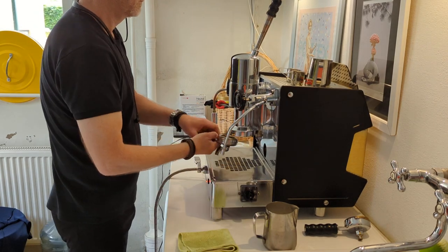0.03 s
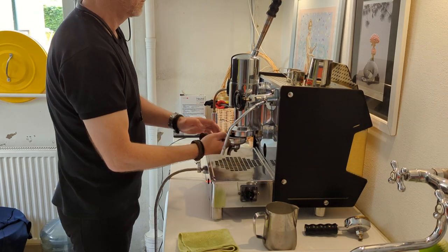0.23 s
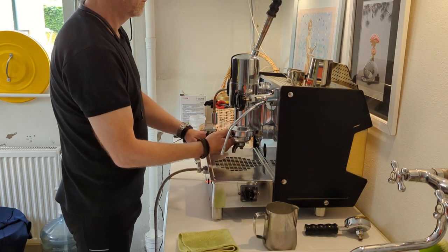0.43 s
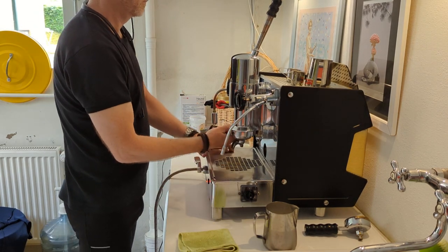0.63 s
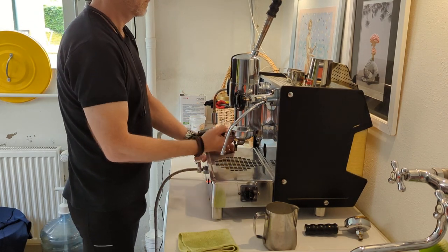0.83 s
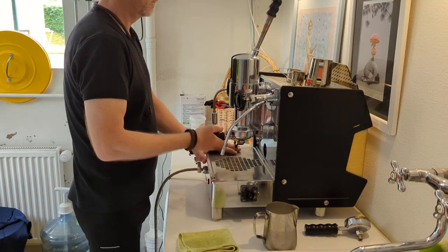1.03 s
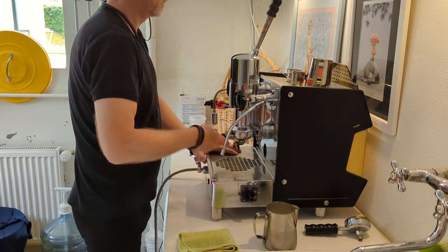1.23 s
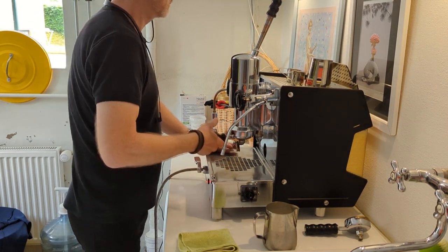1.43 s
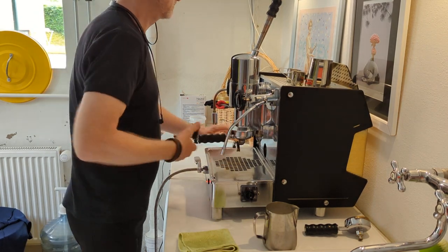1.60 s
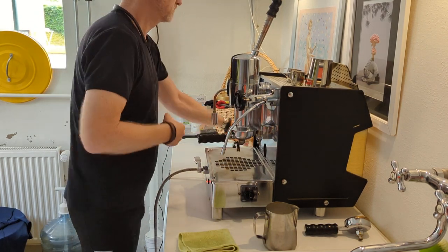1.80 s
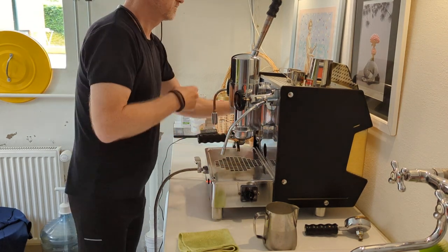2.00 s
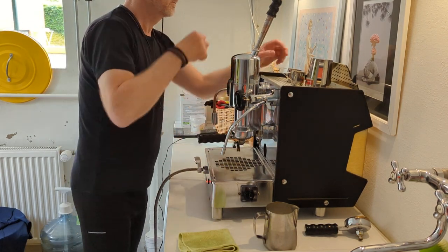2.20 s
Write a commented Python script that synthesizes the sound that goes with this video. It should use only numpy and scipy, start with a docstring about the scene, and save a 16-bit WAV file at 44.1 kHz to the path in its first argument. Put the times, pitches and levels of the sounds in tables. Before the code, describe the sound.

A steel portafilter clunks against an espresso machine at about 0.25 seconds, then rattles in a quick cluster of knocks from 0.5 to 0.65 seconds as the casing booms low. It scrapes at 0.8 seconds, with fainter scrapes and ticks until 1.5. A palm slaps the handle at 1.7 seconds, and clothes rustle softly until about 2.3. The sound is fairly close, in a small, quiet room.

```python
"""In a small, hard-walled quiet room, a steel portafilter is pushed up into the group of a lever espresso
machine, about a metre and a half away. It knocks and chatters against the collar, exciting steel modes
and panels, while the casing booms under the hands. Stick-slip friction scrapes as it is turned tight.
At 1.7 s a palm slaps the handle home; then clothes rustle and sleeves hiss as the arms rise."""
import sys
import numpy as np
from scipy import signal
from scipy.fft import rfft, irfft
from scipy.io import wavfile
from scipy.ndimage import uniform_filter1d

SR = 44100
rng = np.random.default_rng(int(sys.argv[2]) if len(sys.argv) > 2 else 0)


def master_out(mix):
    """Clip the mix to full scale and print it as 16-bit PCM to the path in sys.argv[1]."""
    frames = np.transpose(np.atleast_2d(mix))
    ceiling = np.clip(frames, -1, 1)
    pcm = np.round(ceiling * 32767).astype(np.int16)
    wavfile.write(sys.argv[1], SR, pcm)


N = 103635

# steel on steel (time [s], level [dB], bass [dB], hollowness [dB], brightness [dB], air [dB],
# chatter decay [s], ring against panels [dB], two favoured resonances [Hz])
KNOCK_EVENTS = [(0.2357, -33.5, -1, 1.5, 1.5, 10, 0.013, -2, 3320, 10000),
                (0.2690, -28, -9.5, -7, 1, -3, 0.0017, -3.5, 1740, 1994),
                (0.3135, -39.5, 1, 2, -8, 4.5, 0.0073, -6, 1994, 3320),
                (0.408, -41.5, -8, -0.5, -9, -5.5, 0.0048, -4, 1331, 1655),
                (0.495, -31.5, -1, 4, 6.5, 1, 0.0017, 2, 1198, 2812),
                (0.5301, -25.5, -3.5, -0.5, -5, 0.5, 0.0015, -1, 1198, 6380),
                (0.5426, -29, -3, -2, -2, -8.5, .002, -0.5, 1331, 1994),
                (0.5780, -36, 4.5, 5, 12.5, 13, 0.0032, -7.5, 2502, 4650),
                (0.5860, -30.5, -1.5, -7.5, 7, 8, 0.002, -1.5, 2812, 3320),
                (0.6350, -22, -1.5, -5, -2, -3, 0.0011, -4, 1922, 4404),
                (0.6435, -24, -0.5, 0, -8, -9, 0.0064, -2, 1922, 2812),
                (1.2338, -56, 9.5, -0.5, 1, -12, 0.0089, -6, 300, 6380),
                (1.2700, -52.5, 7, 0, -7, -15, 0.0061, -6.5, 300, 699)]
def knocks():
    """Impact excitation: the portafilter delivers an impulse, then dying chatter on the collar."""
    t, out = np.arange(SR // 3) / SR, np.zeros(N)
    for start, db, *tone_db, chatter_s, ring_db, first_hz, second_hz in KNOCK_EVENTS:
        chatter = energy(contacts(t) * np.exp(-t / chatter_s))
        force = (t == 0) + undb(-4.5) * chatter
        out += undb(db) * place(metal(force, t, ring_db, tone_db, (first_hz, second_hz)), start)
    return out


# lugs on the collar (time [s], level [dB], bass [dB], brightness [dB], air [dB], rise [s], fall [s])
SCRAPE_EVENTS = [(0.434, -50, -7, -10, -1, 0.023, 0.014), (0.8150, -48.5, -8, 8.5, 4, 0.0013, 0.0093),
                 (0.8215, -35.5, 0.5, -4.5, -8.5, 0.018, .018), (1.0080, -61.5, 13, 2, 19.5, 0.0051, 0.052),
                 (1.024, -51, 3, -13.5, -1, 0.0087, 0.018), (1.1050, -59.5, 4, -4.5, 3, 0.0086, 0.02),
                 (1.444, -64.5, 14.5, -3.5, 2, 0.028, 0.064)]
def scrapes():
    """Stick-slip friction: the turning lugs drive the metal with a swell of tiny contacts."""
    t, out = np.arange(SR // 3) / SR, np.zeros(N)
    for start, db, bass, bright, air, rise, fall in SCRAPE_EVENTS:
        force = contacts(t) * swell(t, rise, fall)
        out += undb(db) * place(metal(force, t, ring_db=-6.5, tone_db=(bass, 0, bright, air)), start)
    return out


def contacts(t, per_s=730):
    """Poisson process: tiny contacts of random size."""
    return (rng.random(len(t)) < per_s / SR) * rng.standard_normal(len(t))


def metal(force, t, ring_db, tone_db, favoured_hz=()):
    """Superposition: panels and steel ring together; the point of contact sets the colour."""
    sound = energy(panels(force) + undb(ring_db) * steel_ring(force, t, favoured_hz))
    bass, hollow, bright, air = tone_db
    tone = [(250, bass), (800, hollow), (1250, hollow), (1900, 0), (4000, bright), (12000, air)]
    return colour(sound, tone) * np.sqrt(SR / 100)


# modes of portafilter and group (frequency [Hz], level [dB], T60 [s])
STEEL_RESONANCES = [(300, -2.5, 0.19), (455, -12.5, 0.46), (699, -4, 0.075), (835, -8, .15),
                    (1198, -8.5, .16), (1331, 1, 0.18), (1655, -14.5, 0.21), (1740, -8.5, 0.11),
                    (1922, -11.5, .16), (1994, -4, 0.053), (2502, -3, 0.081), (2812, -5.5, 0.06),
                    (3320, -11.5, 0.064), (3628, -17, 0.2), (4404, -17, 0.073), (4650, -11, 0.033),
                    (6380, -14.5, 0.11), (10000, -25.5, .06), (11470, -17, 0.044)]
def steel_ring(force, t, favoured_hz):
    """Modal ringing: clusters of three close modes beat; those the contact favours are lifted."""
    favour_db, reach, split = 9.5, 0.057, 0.0072  # reach and split are shares of the frequency
    ring = 0
    for hz, db, t60 in STEEL_RESONANCES:
        lift_db = favour_db * sum(np.exp(-(np.log(hz / f) / reach) ** 2) for f in favoured_hz)
        cluster_hz = (hz * (1 + split * (k + rng.random() - .5)) for k in (-1, 0, 1))
        cluster = sum(np.sin(2 * np.pi * (f * t + rng.random())) for f in cluster_hz)
        ring += undb(db + lift_db) * energy(cluster * stored_amplitude(force, t60))
    return energy(ring)


# ring of the panels (frequency [Hz], spectral level [dB])
PANEL_SPECTRUM = [(35, -27), (70, -6), (135, 6.5), (200, -8), (290, 4), (360, -3.5), (560, -5.5), (800, 0),
                  (1400, 1), (2600, -1.5), (3800, -5), (5400, -15), (6500, -14), (8200, -24), (11800, -22),
                  (16000, -34)]
def panels(force):
    """Modal overlap: dense, quickly damped modes merge into noise."""
    return energy(colour(burst(stored_amplitude(force, t60=0.033)), PANEL_SPECTRUM))


def stored_amplitude(force, t60):
    """Energy balance: each contact adds energy and damping drains it."""
    return np.sqrt(signal.lfilter([1], [1, -fade(2 / SR, t60)], force ** 2 + 1e-18))


# skin smack and fleshy thud on the handle (frequency [Hz], spectral level [dB])
SKIN_SPECTRUM = [(100, -9), (700, 2.5), (2800, -8.5), (4400, -18), (8000, -18), (13000, -12.5),
                 (15500, -21)]
THUD_SPECTRUM = [(35, -31), (80, 3.5), (120, -0.5), (170, -0.5), (260, 7.5), (400, 1.5), (550, -7),
                 (720, 3.5), (900, -4), (1700, -5), (2800, -4), (4200, -22.5), (6500, -18.5), (9000, -26),
                 (16000, -24)]
def slap():
    """Soft impact: the palm lands, the weight of the hand follows, and the fingers close."""
    t = np.arange(SR // 4) / SR
    thud = colour(burst(swell(t, rise=0.003, fall=0.014)), THUD_SPECTRUM)
    palm, fingers = (colour(burst(swell(t, rise=0.00043, fall=0.0045)), SKIN_SPECTRUM) for _ in range(2))
    return blow(palm, 1.7055, db=-38.5) + blow(thud, 1.7130, db=-30.5) + blow(fingers, 1.7205, db=-39)


# low modes of the casing (frequency [Hz], width of the narrower filter [Hz], level [dB])
CASING_MODES = [(66.7, 18, 2), (97, 14.6, -5), (139, 26, -5), (159.3, 61, -8), (285, 37, -12.5),
                (418, 74, -12), (690, 370, -13)]
# their boom (time [s], level [dB])
BOOM_LEVEL = [(0, -65.5), (.21, -86), (.26, -51), (.44, -49.5), (.53, -44), (.68, -42.5), (.76, -47.5),
              (.84, -49.5), (.97, -55.5), (1.17, -59.5), (1.28, -51.5), (1.44, -59), (1.53, -55),
              (1.66, -61), (1.8, -66), (1.95, -67), (2.08, -80), (2.35, -66)]
def casing():
    """Forced vibration: pushing and twisting shakes the low modes of the machine."""
    boom = 0
    for hz, width, db in CASING_MODES:
        q = hz / width
        drive = signal.lfilter(*signal.iirpeak(hz, q / 2, SR), rng.standard_normal(N))
        boom += undb(db) * unit(signal.lfilter(*signal.iirpeak(hz, q, SR), drive))
    return unit(boom) * curve(BOOM_LEVEL)


# rustle of cloth and fine hiss of sleeves (time [s], level [dB])
RUSTLE_LEVEL = [(0, -74), (.9, -69.5), (1.6, -75), (1.68, -58.5), (1.85, -66), (1.92, -73), (1.97, -64),
                (2.02, -69.5), (2.09, -70.5), (2.125, -63.5), (2.15, -68), (2.18, -63), (2.215, -67.5),
                (2.29, -60), (2.35, -62.5)]
HISS_LEVEL = [(0, -79), (2.1, -103.5), (2.2, -74), (2.3, -64), (2.35, -67)]
# their colours (frequency [Hz], spectral level [dB])
RUSTLE_SPECTRUM = [(100, -5), (350, -6.5), (800, -2.5), (1300, -2), (2000, 1), (3000, -3), (4500, -15.5),
                   (6500, -18), (9000, -34.5), (14000, -23), (16000, -26)]
HISS_SPECTRUM = [(1000, -18), (4500, 3.5), (6500, 1), (8500, -6.5), (12000, -2.5), (14000, 6), (16000, -11)]
def clothes():
    """Friction noise: cloth rustles, and the sleeves hiss as the arms rise."""
    return wash(RUSTLE_SPECTRUM) * curve(RUSTLE_LEVEL) + wash(HISS_SPECTRUM) * curve(HISS_LEVEL)


# still room air (frequency [Hz], spectral level [dB])
AIR_SPECTRUM = [(25, -24), (60, -3.5), (105, 10), (200, -11), (300, -17.5), (420, -5.5), (800, -15.5),
                (1500, -17), (3000, -9), (5000, -19), (8000, -23.5), (13000, -21), (16000, -41)]
def room_air():
    """Ambient noise: a faint, steady diffuse field."""
    return wash(AIR_SPECTRUM) * undb(-71)


def room(x):
    """Reverberation: direct sound, reflections off counter and corner, a tail whose treble dies first."""
    early_db, tail_db, gain_db = 6.5, -2, 5
    t = np.arange(SR) / SR
    early = diffuse(SR) * fade(t, t60=0.11) * np.minimum(t / 0.00067, 1)
    rest, tail = diffuse(SR), 0
    for hz in 250 * 2 ** np.arange(7):
        band = signal.sosfiltfilt(signal.butter(2, hz, fs=SR, output="sos"), rest)
        rest = rest - band
        tail += band * fade(t, t60=0.3 * (hz / 2000) ** -0.1)
    tail *= np.minimum(t / 0.018, 1)
    channels = []
    for reflections, late in zip(early, tail):
        response = (t == 0) + undb(early_db) * energy(reflections) + undb(tail_db) * energy(late)
        channels.append(signal.fftconvolve(x, energy(even(response)[:SR * 3 // 4]))[:N])
    return undb(gain_db) * np.array(channels)


def diffuse(count, half_coherence_hz=424):
    """Diffuse field: left and right are coherent in the bass, unrelated in the treble."""
    mid, side = rng.standard_normal((2, count))
    hz = np.arange(count // 2 + 1) * SR / count
    coherence = 1 / (1 + (hz / half_coherence_hz) ** 2.45)
    mid = irfft(rfft(mid) * np.sqrt(1 + coherence), count)
    side = irfft(rfft(side) * np.sqrt(1 - coherence), count)
    return np.array([mid + side, mid - side]) / np.sqrt(2)


def wash(spectrum):
    """Coloured diffuse noise at rms 1."""
    return unit(np.array([colour(channel, spectrum) for channel in diffuse(N)]))


def burst(envelope):
    """Whitened noise burst, gated to die with its envelope."""
    gate = np.minimum(10 * np.maximum.accumulate(envelope[::-1])[::-1] / envelope.max(), 1)
    return even(rng.standard_normal(len(envelope)) * envelope) * gate


def even(x, span_hz=120):
    """Spectral whitening: levels out chance peaks and dips."""
    spectrum = rfft(x)
    power = uniform_filter1d(np.abs(spectrum) ** 2, max(int(span_hz * len(x) / SR), 1))
    return irfft(spectrum / np.sqrt(power + 1e-12), len(x))


def colour(x, points, size=4096):
    """Minimum-phase filter through (frequency [Hz], level [dB]) points."""
    hz, db = np.array(points, float).T
    bins_hz = np.maximum(np.arange(size // 2 + 1) * SR / size, 1)
    cepstrum = irfft(np.log(undb(np.interp(np.log(bins_hz), np.log(hz), db))))
    cepstrum *= np.r_[1, np.full(size // 2 - 1, 2), 1, np.zeros(size // 2 - 1)]  # makes it causal
    return signal.fftconvolve(x, irfft(np.exp(rfft(cepstrum))))[:len(x)]


def swell(t, rise, fall):
    """Linear rise, exponential fall."""
    return np.minimum(t / rise, 1) * np.exp(-np.maximum(t - rise, 0) / fall)


def fade(t, t60):
    """Exponential damping: 60 dB lost in t60."""
    return np.exp(-np.log(1000) * t / t60)


def curve(points):
    """Gain through (time [s], level [dB]) points."""
    return undb(np.interp(np.arange(N) / SR, *np.array(points).T))


def blow(x, start_s, db):
    """Place a transient with the energy of 10 ms at this level."""
    return place(energy(x) * undb(db) * np.sqrt(SR / 100), start_s)


def place(x, start_s):
    """Delay a sound to its start time."""
    return np.r_[np.zeros(int(start_s * SR)), x, np.zeros(N)][:N]


def undb(db):
    """Decibels to gain."""
    return 10 ** (np.asarray(db) / 20)


def unit(x):
    """Normalise to rms 1."""
    return x / np.sqrt(np.mean(x ** 2))


def energy(x):
    """Normalise to energy 1."""
    return x / np.sqrt(np.sum(x ** 2))


def scene():
    """Superposition: reverberant contacts over boom, clothes and air."""
    return room(knocks() + scrapes() + slap()) + casing() + clothes() + room_air()


def record(dry, low_hz=53, top_hz=16000):
    """Band limiting: the deepest rumble and the top treble are cut."""
    lean = signal.sosfilt(signal.butter(3, low_hz, "high", fs=SR, output="sos"), dry)
    return signal.sosfilt(signal.ellip(10, .2, 80, top_hz, fs=SR, output="sos"), lean)


dry = scene()
out = record(dry)
master_out(out)
```